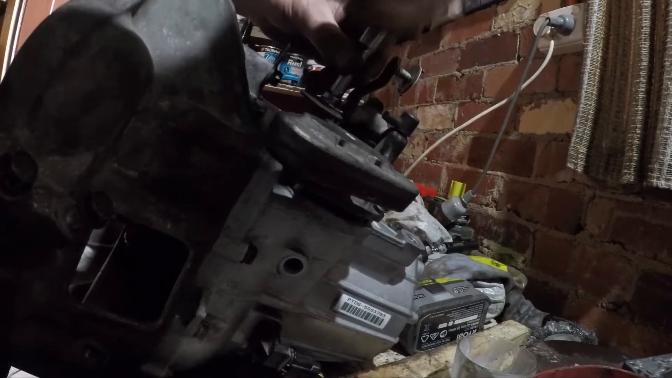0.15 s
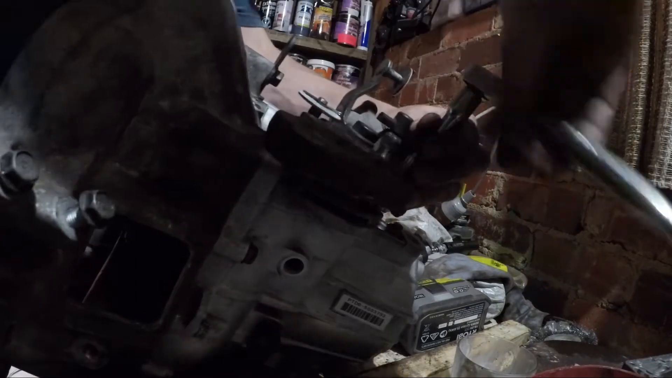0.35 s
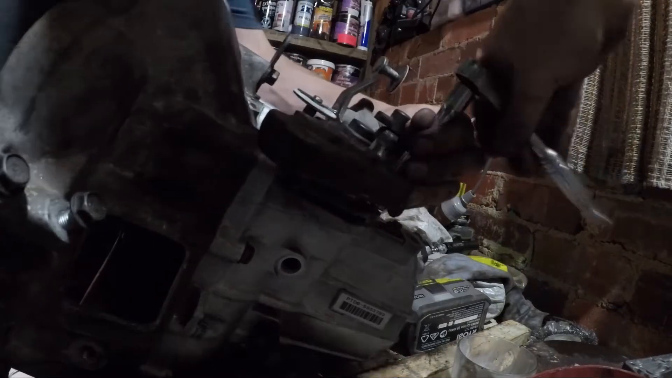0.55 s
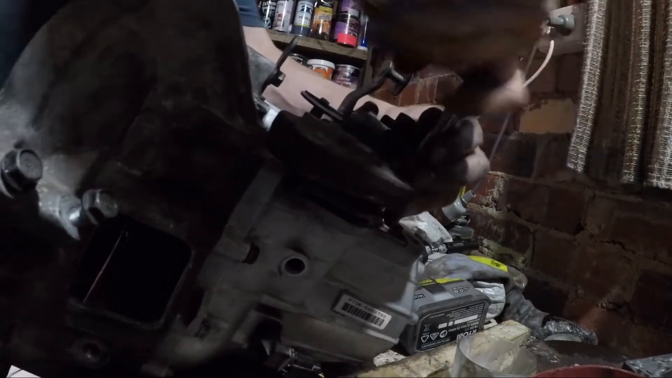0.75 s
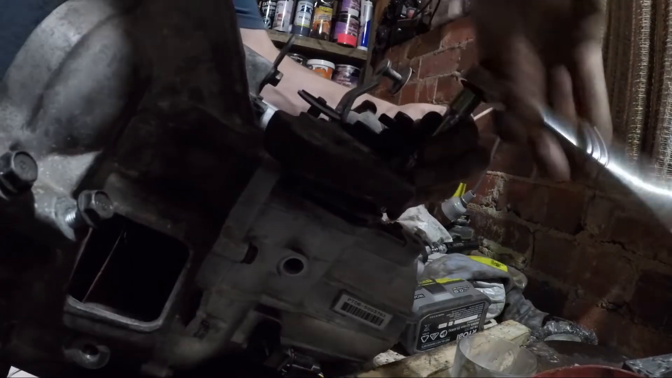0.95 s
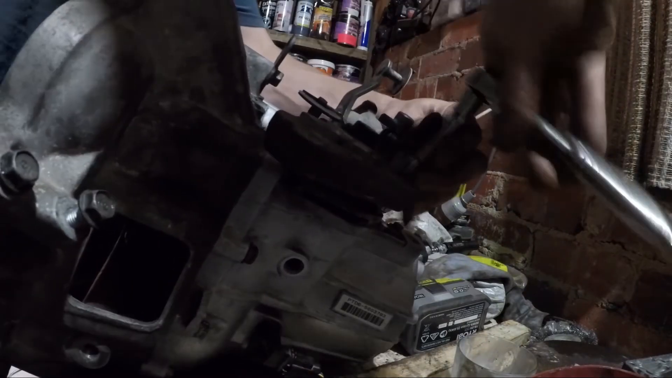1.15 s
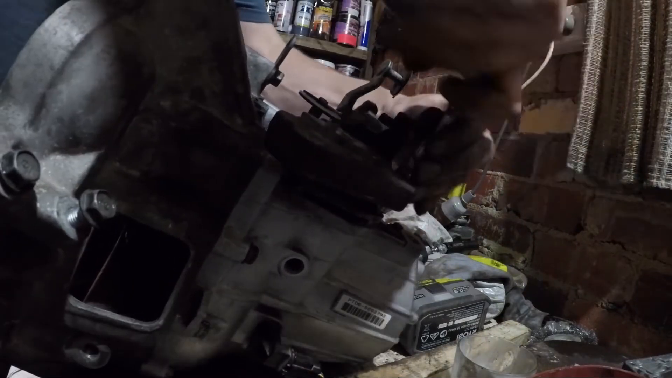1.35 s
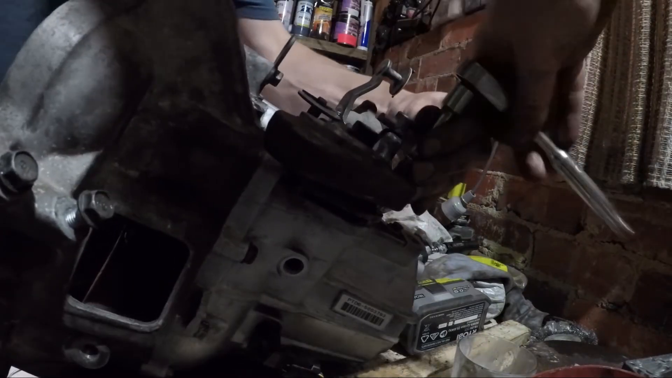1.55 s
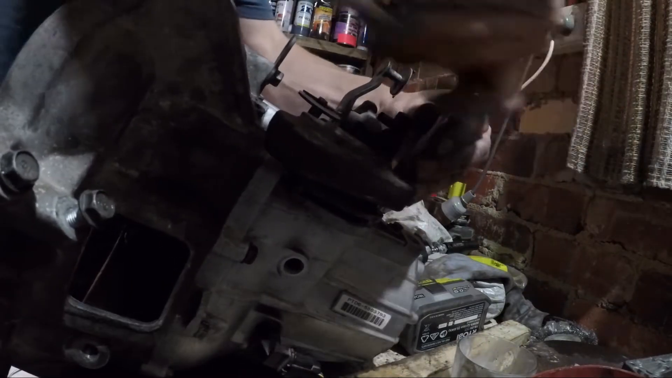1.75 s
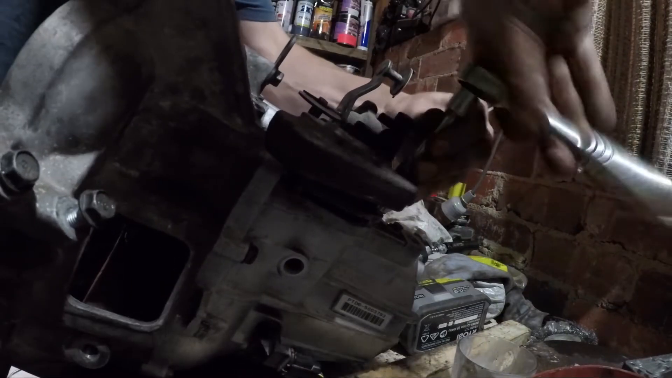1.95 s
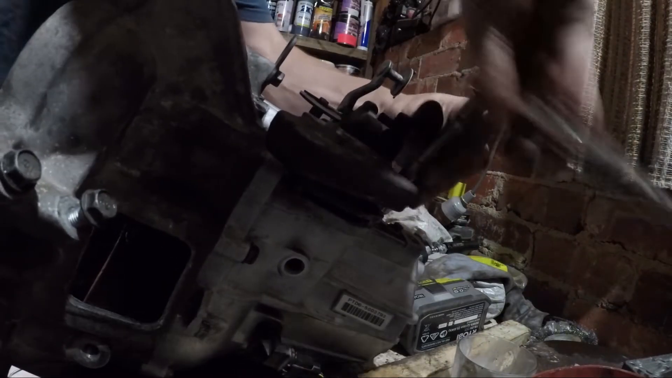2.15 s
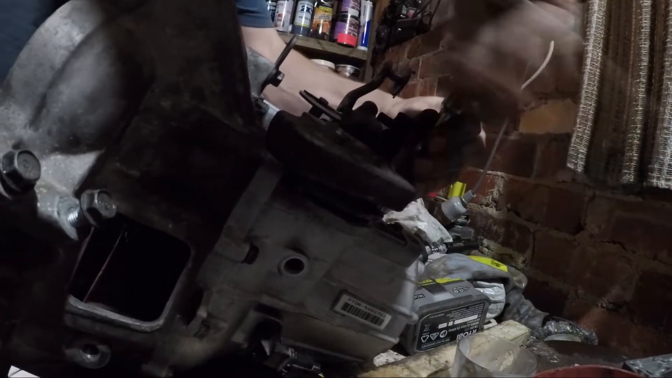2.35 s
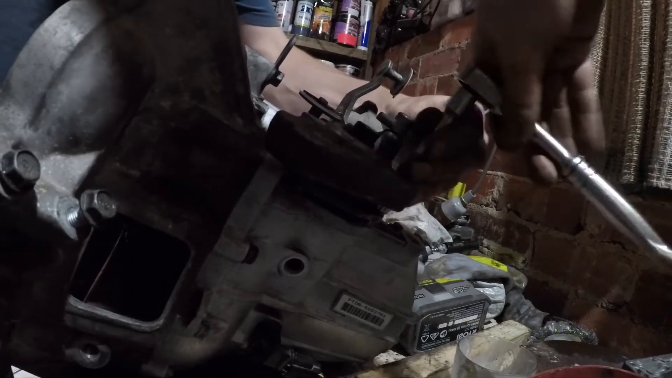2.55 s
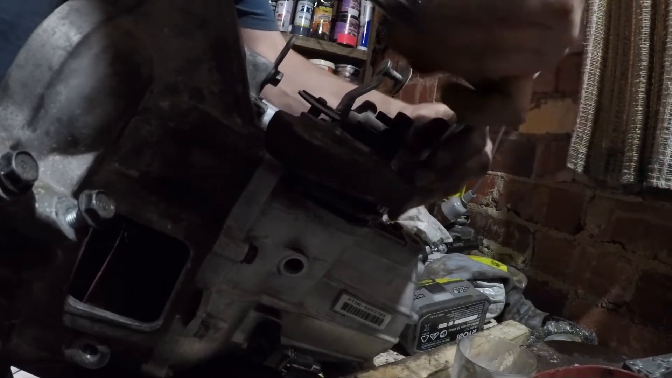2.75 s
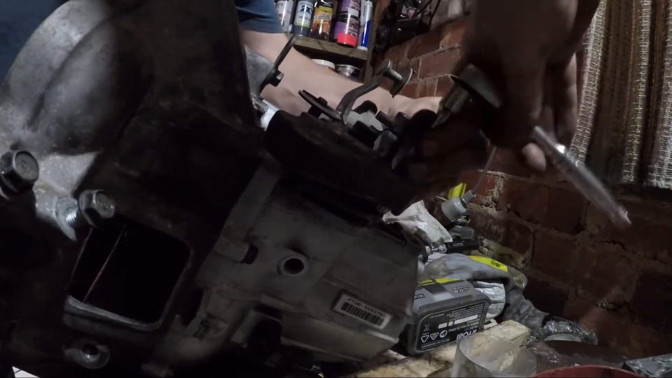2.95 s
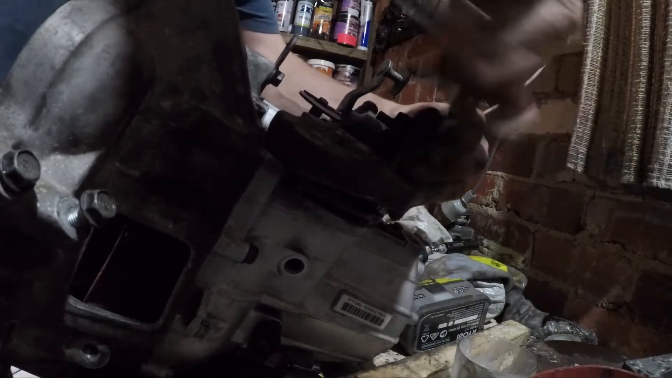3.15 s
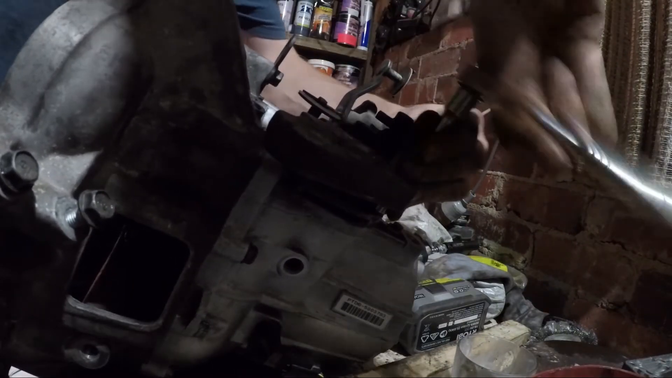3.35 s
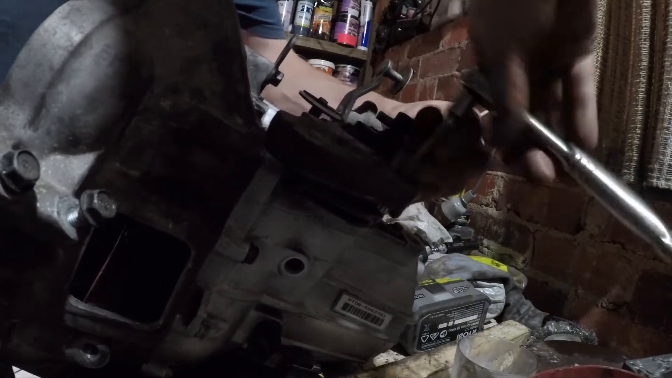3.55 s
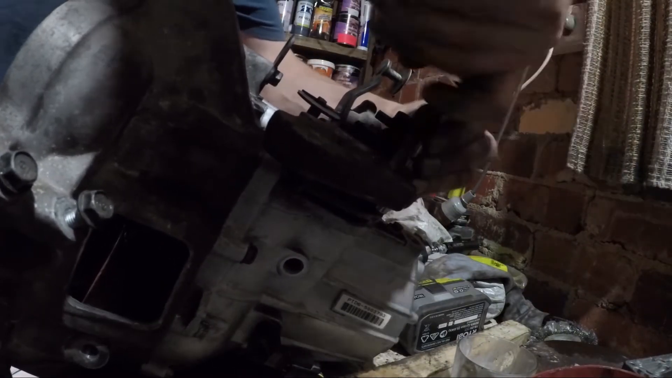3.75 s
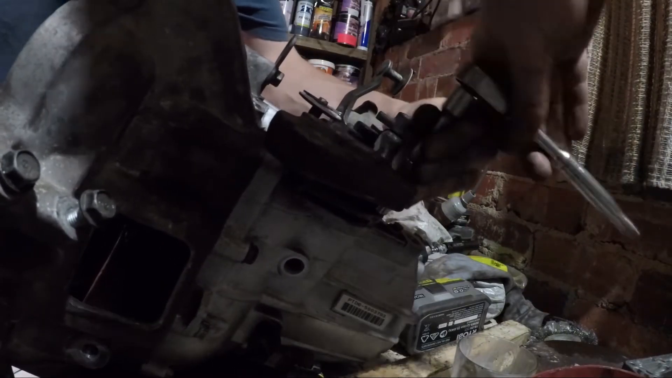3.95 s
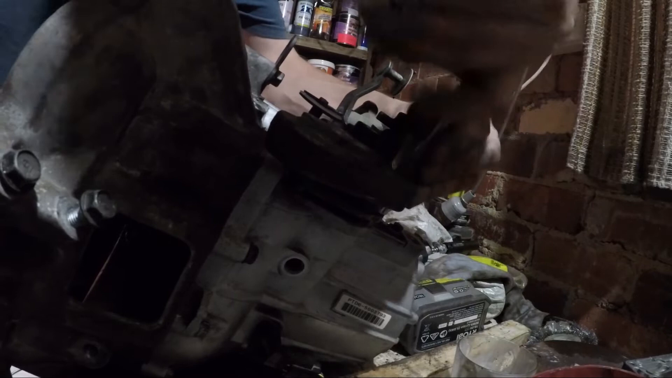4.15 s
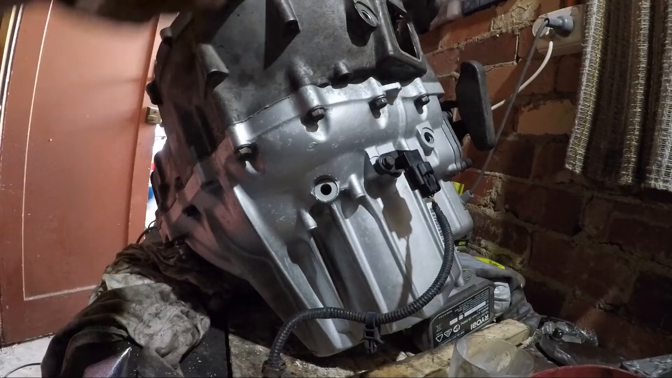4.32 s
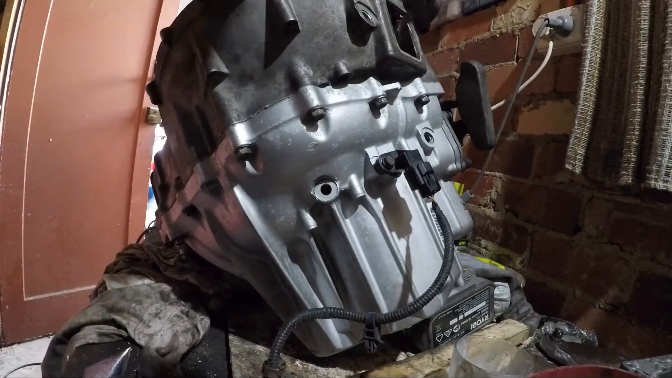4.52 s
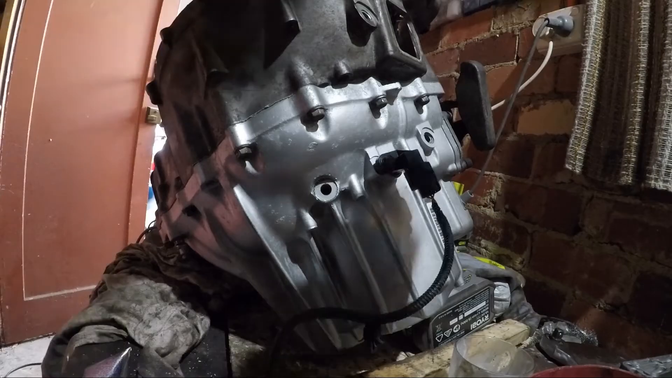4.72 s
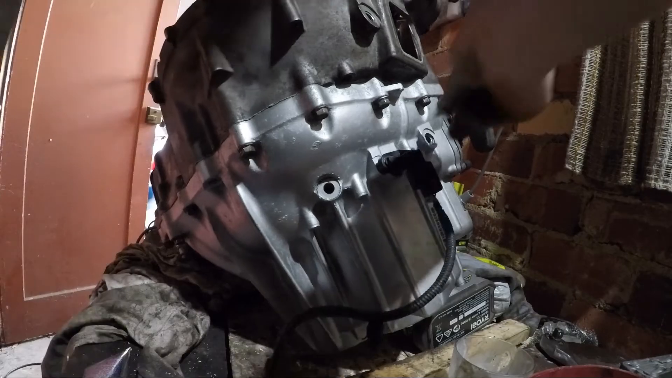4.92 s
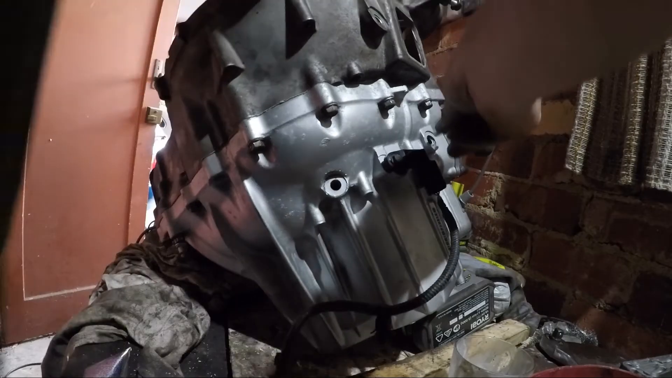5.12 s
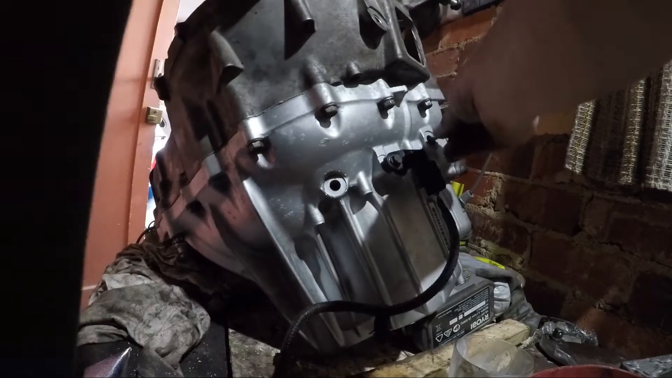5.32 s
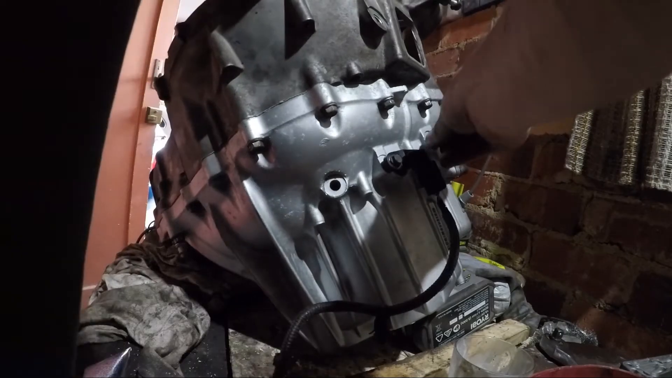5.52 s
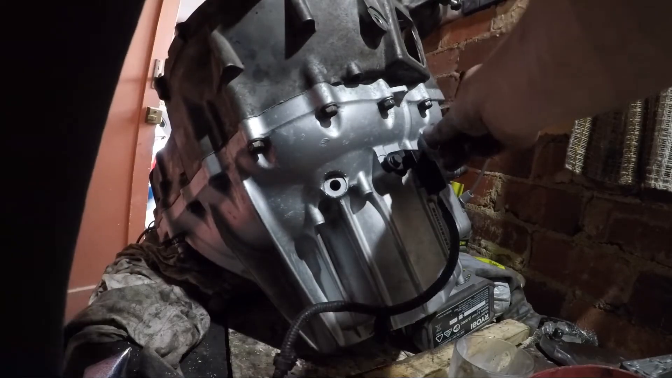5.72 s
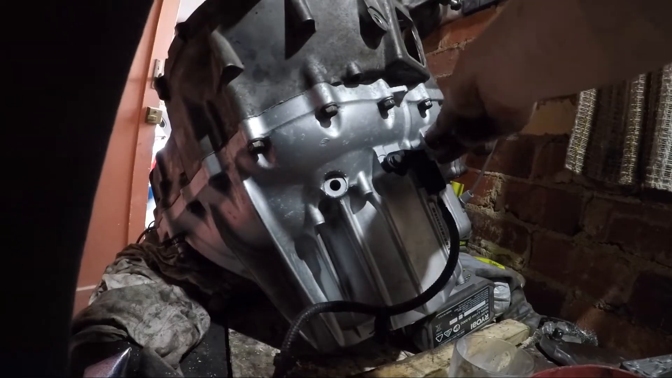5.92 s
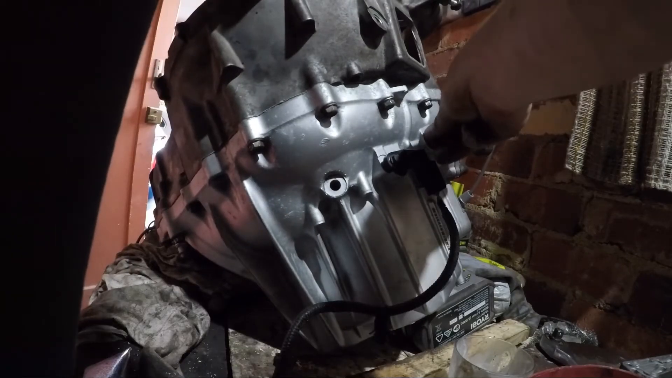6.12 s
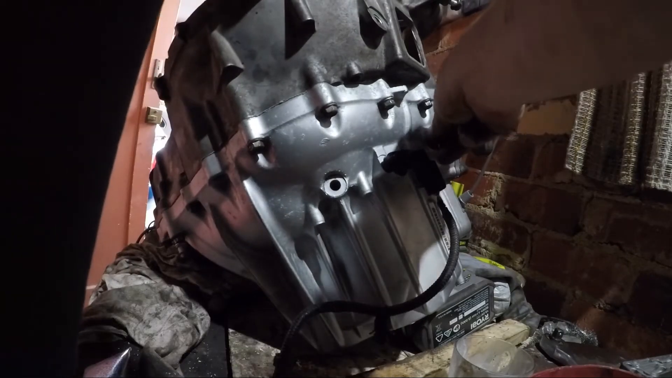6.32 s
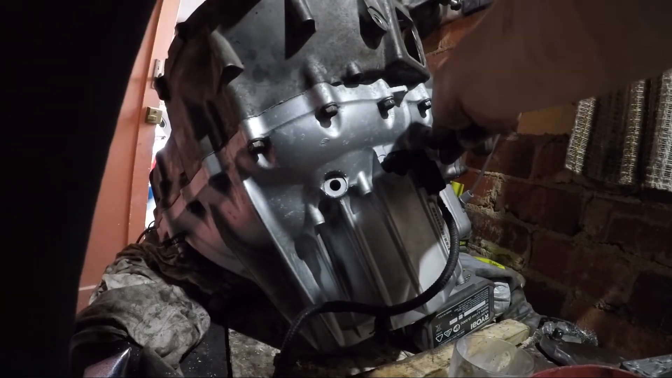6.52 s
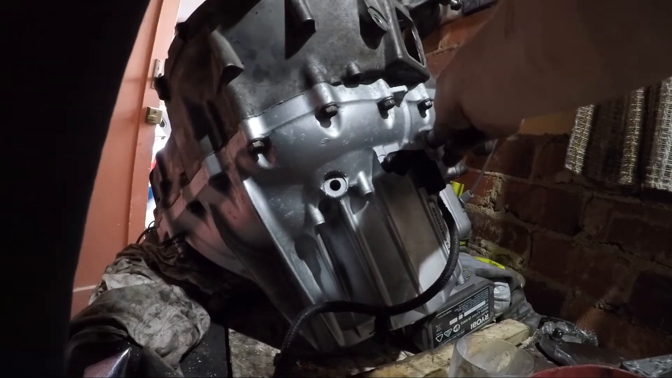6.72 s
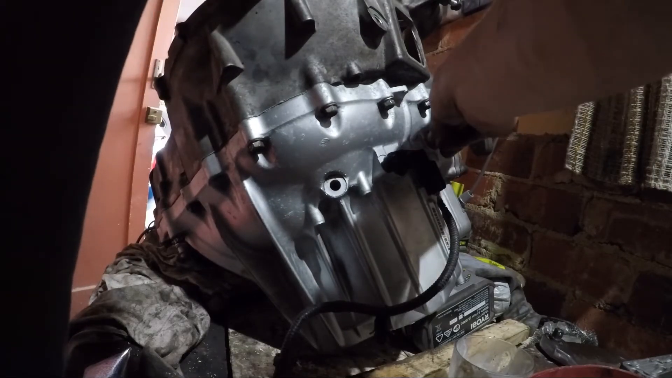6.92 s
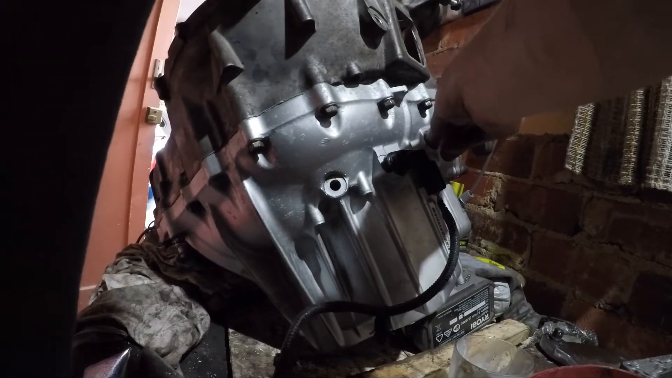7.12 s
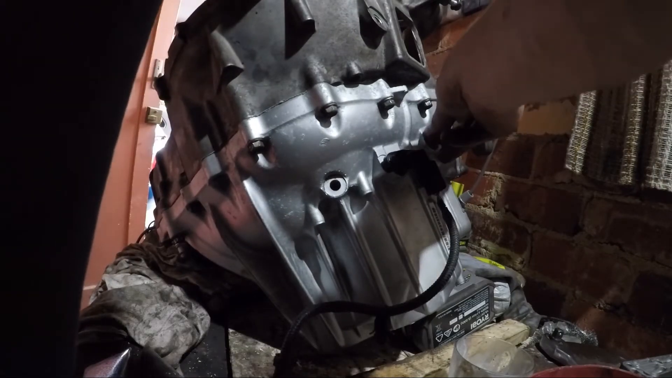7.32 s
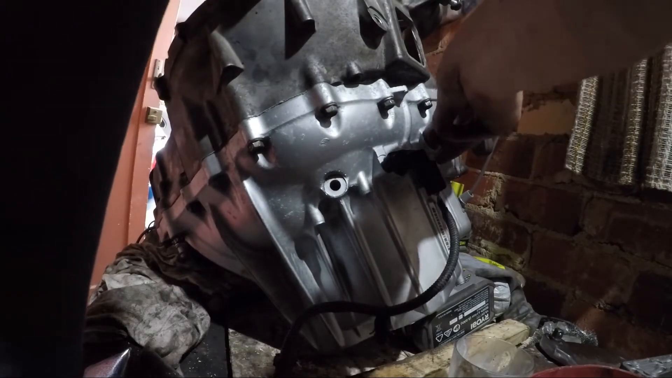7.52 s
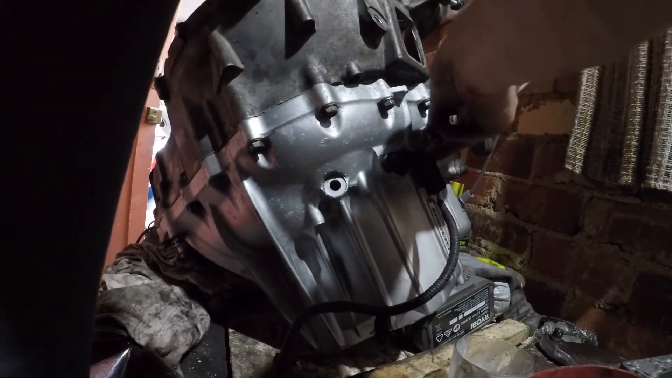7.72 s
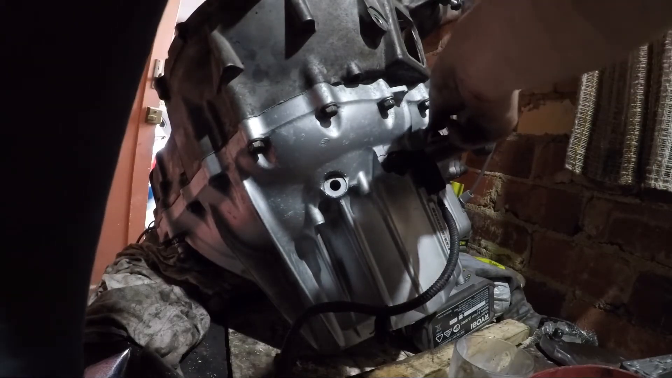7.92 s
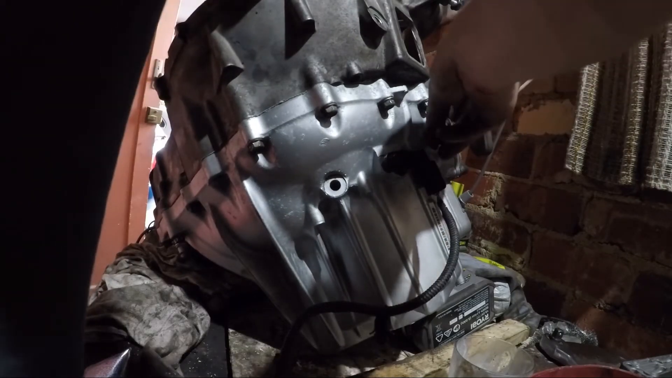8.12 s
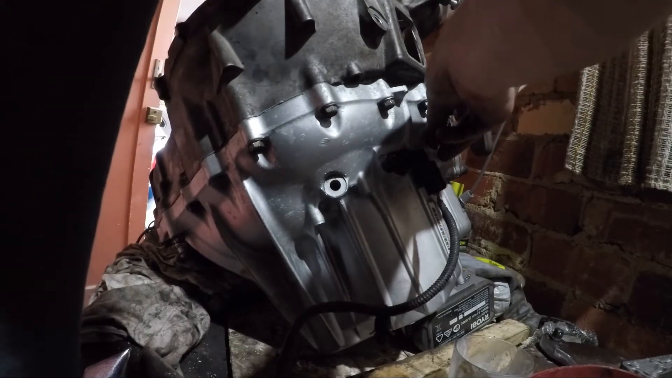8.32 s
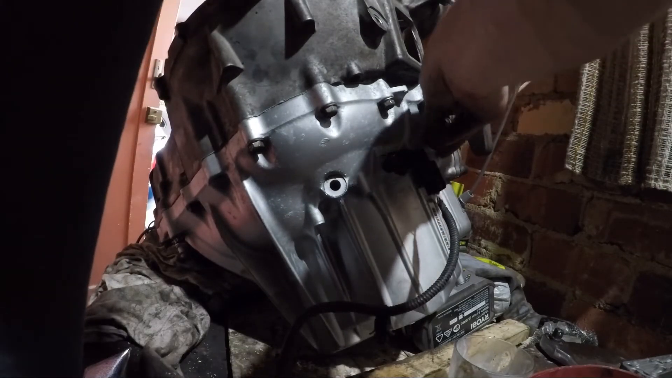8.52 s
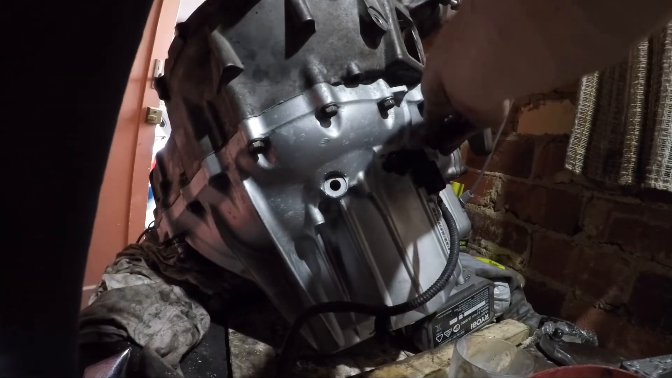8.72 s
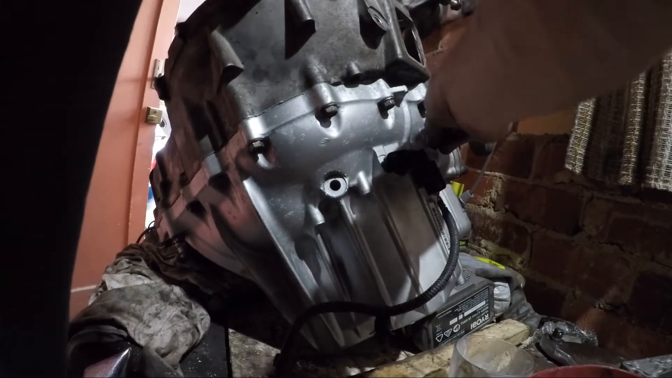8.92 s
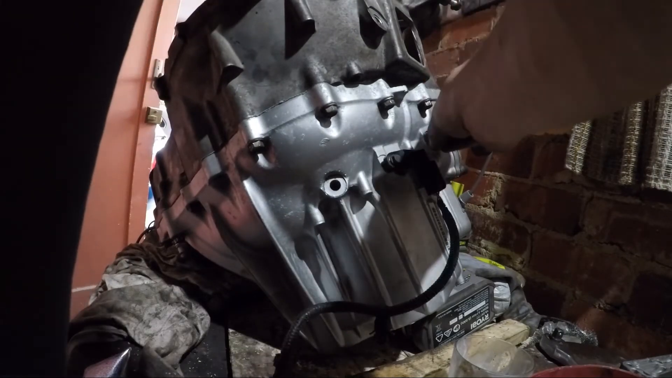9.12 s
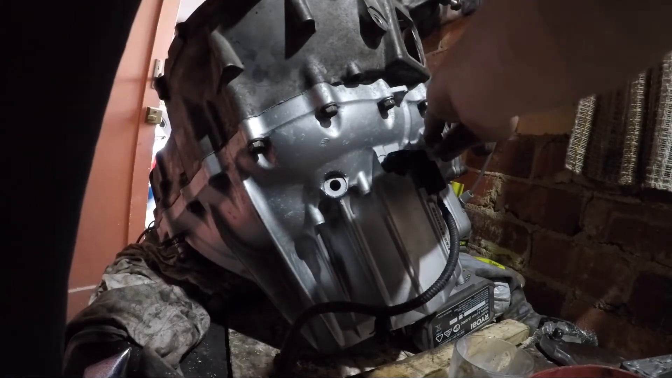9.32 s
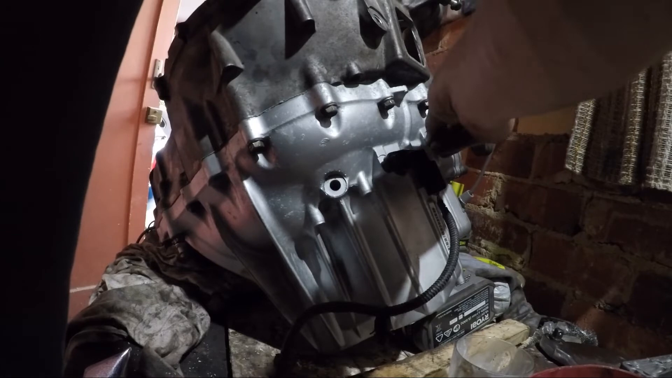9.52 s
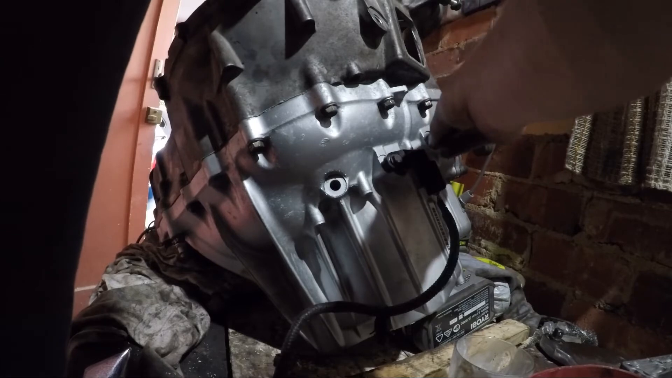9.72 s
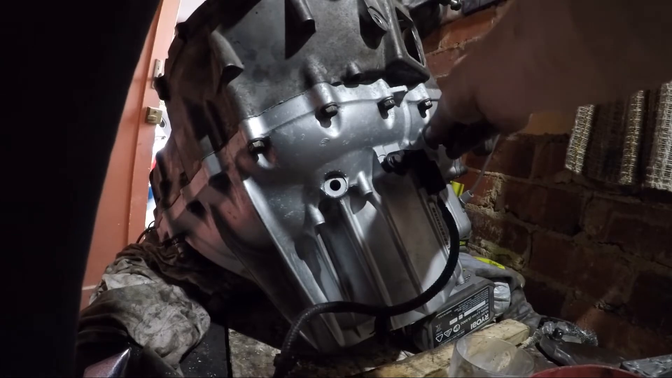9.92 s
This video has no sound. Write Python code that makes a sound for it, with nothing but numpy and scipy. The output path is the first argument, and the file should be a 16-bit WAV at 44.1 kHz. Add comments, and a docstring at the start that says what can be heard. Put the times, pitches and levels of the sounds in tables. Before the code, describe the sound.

A socket ratchet clicks in short repeated strokes over low bumps and hiss, then stops, leaving faint scrapes and ticks as a bolt is fitted.

```python
"""Microphone hiss and a soft thump ten times a second, probably radio interference, run throughout.
From the start a socket ratchet is swung to and fro on a gearbox in a small brick workshop: on each
return stroke the pawl strikes tooth after tooth, and the work shakes the microphone's mount into a low
rumble. Near 4.2 s the ratchet sound cuts off abruptly; a separate faint ring of struck metal fades.
Fingers then fit a bolt with faint scrapes and ticks; around 5 s a push makes the mount rumble again."""
import sys
import numpy as np
from scipy import signal
from scipy.fft import rfft, irfft, next_fast_len
from scipy.io import wavfile

SR = 44100
rng = np.random.default_rng(int(sys.argv[2]) if len(sys.argv) > 2 else 0)


def dump_mix(stems):
    """Bounce the given channels to the path in sys.argv[1] as a 16-bit WAV at rate SR."""
    frames = np.atleast_2d(stems).T  # one column per channel
    limited = np.clip(frames, -1, 1)  # hard clip at full scale
    pcm = np.round(limited * 32767).astype(np.int16)
    wavfile.write(sys.argv[1], SR, pcm)


N = 439236
TIME = np.arange(N) / SR
RATCHET_END_S, MOUNT_PUSH_S = 4.179, 4.44

# Table levels are relative: each source applies its own gain.
# hiss in the sum and in the difference of the channels (frequency [Hz], spectral density [dB])
HISS_MID = [(20, -47), (80, -47), (103, -52), (130, -6), (166, -0.5), (283, -6), (634, -14.5), (1280, -18),
            (3320, -24), (4980, -28), (6560, -25), (9410, -26.5), (12700, -33.5), (15000, -45),
            (16000, -66)]
HISS_SIDE = [(59, -72.5), (100, -50), (135, -9), (156, 0), (373, -4.5), (442, -6), (768, -5.5), (818, -8),
             (970, -6), (3780, -29.5), (6290, -26), (10000, -27.5), (14400, -39.5), (16000, -55)]
# jolts through the mount (time [s], knock level [dB], shaking level [dB])
JOLTS = [(.01, -60, -32), (.096, -41, -27.5), (.308, -19, -30.5), (0.429, -60, -36), (0.618, -15.5, -23),
         (.68, -60, -25.5), (.758, -45, -27), (0.919, -60, -30), (1.211, -64, -27.5), (1.286, -24, -29.5),
         (1.37, -60, -29.5), (1.446, -17, -29.5), (1.703, -26, -34.5), (1.781, -16, -24.5),
         (1.849, -60, -29), (1.882, -17, -28.5), (2.119, -27, -21.5), (2.26, -60, -22), (2.31, -60, -23.5),
         (2.37, -60, -28), (2.479, -30, -29), (2.564, -35, -32), (2.608, -27, -26.5), (2.761, -31, -25),
         (3.084, -20, -27.5), (3.2, -60, -28.5), (3.257, -15, -28), (3.313, -20, -30), (3.385, -60, -31.5),
         (3.527, -34, -33), (3.6, -60, -32), (3.697, -13.5, -26.5), (3.751, -16, -21), (3.81, -60, -24.5),
         (3.9, -60, -30.5), (3.967, -32, -32.5), (4.06, -60, -31), (4.129, -14, -23.5), (4.17, -60, -39.5),
         (4.521, -60, -37.5), (4.613, -60, -33), (4.73, -20.5, -31.5), (4.83, -60, -36), (4.894, -25, -30),
         (4.962, -29, -19.5), (5.01, -7, -22.5), (5.09, -60, -39), (5.53, -55, -53), (5.924, -58, -44)]
# the mount when shaken, pushed, swaying and rubbing (frequency [Hz], spectral density [dB])
SHAKE_SPECTRUM = [(53, -50), (90, -36), (108, -42), (134, -9), (157, 3.5), (205, -7), (252, -2),
                  (265, -7.5), (296, -31), (376, -63.5), (400, -63), (520, -60.5), (880, -120)]
PUSH_SPECTRUM = [(53, -56), (90, -40), (107, -47), (141, -3.5), (221, 2.5), (300, -9.5), (341, -9.5),
                 (500, -27), (620, -29), (810, -49), (1360, -120)]
SWAY_SPECTRUM = [(12, -31), (20, -3.5), (59, -6), (86, -4.5), (100, 7), (130, -8), (220, -120)]
RUB_SPECTRUM = [(250, -24), (330, -2), (500, -11.5), (1000, -9.5), (2000, -19), (4000, -34)]
# two spells of deep sway, each a list of (time [s], level [dB])
SWAY_SPELLS = [
    [(0, -74), (.3, -76), (.4, -77), (.66, -60), (1.12, -69), (1.45, -54), (1.6, -76), (1.85, -58),
     (2.05, -73), (2.26, -60), (2.48, -70), (2.62, -57), (2.78, -46.5), (3.02, -57.5), (3.32, -52.5),
     (3.5, -60), (3.76, -49), (3.92, -48), (4.17, -40)],
    [(4.5, -80), (4.62, -65), (4.87, -74), (5.1, -52), (5.2, -71), (5.6, -80)],
]
# the thump and the deep sag that follows it (frequency [Hz], level [dB])
THUMP_SPECTRUM = [(90, -50), (112, -45), (135, 0.5), (158, 4.5), (200, -2), (300, -20), (600, -33.5),
                  (1200, -51)]
SAG_SPECTRUM = [(10, -30), (35, -17), (70, -20), (105, -25), (130, -60)]
# first thump of the ratcheting and of the bolt fitting (time [s])
THUMP_STARTS = [.024, 4.2005]
# three groups of modes of ratchet and casting (frequency [Hz], bandwidth [Hz], level [dB])
LOW_MODES = [(2520, 730, -12), (3040, 770, 2.5), (3403, 990, 2.5), (4120, 200, -3), (4564, 490, -7.5)]
HIGH_MODES = [(6100, 1140, -0.5), (6940, 410, 6.5), (7200, 530, 3.5), (8380, 83, -2), (8800, 450, -7),
              (9950, 1470, -9.5), (11700, 360, -20.5), (14000, 2600, -23)]
KNOCK_MODES = [(715, 55, -7), (1186, 99, 6), (1430, 280, 0), (1876, 250, 6)]
# drive of each group (modes, lower edge [Hz], upper edge [Hz], coherence [0-1], left over right [dB])
MODE_GROUPS = [(LOW_MODES, 1960, 8900, 0.84, -2.2), (HIGH_MODES, 3630, 14000, 0.23, 0.4),
               (KNOCK_MODES, 520, 2850, 0.082, -0.36)]
# socket, handle and bolt touching metal (time [s], low modes [dB], high modes [dB], knock modes [dB])
TICKS = [(.0704, -48, -47, -45), (.0807, -38, -44, -45), (.0877, -32, -27, -42), (.3017, -37, -34, -40),
         (.3061, -33, -37, -34), (.3164, -35, -37, -38), (.5018, -44, -48, -50), (.5668, -44, -50, -48),
         (.6044, -35, -38, -38), (.6186, -29, -38, -37), (.6346, -43, -51, -49), (.7571, -34, -43, -49),
         (.764, -40, -42, -41), (1.1849, -41, -38, -47), (1.2053, -40, -40, -45), (1.2324, -42, -34, -48),
         (1.2495, -29, -27, -49), (1.2586, -49, -37, -49), (1.6994, -40, -35, -49), (1.7104, -48, -42, -48),
         (1.7406, -45, -46, -55), (1.7722, -33, -37, -40), (2.1175, -42, -41, -41), (2.1479, -35, -35, -47),
         (2.1687, -32, -31, -47), (2.1846, -46, -42, -53), (2.2051, -42, -42, -52), (2.2334, -36, -43, -46),
         (2.465, -44, -41, -47), (2.4888, -41, -48, -44), (2.6023, -31, -28, -32), (2.6202, -32, -33, -41),
         (2.6788, -44, -47, -40), (2.7022, -40, -42, -52), (3.0502, -41, -39, -47), (3.0839, -32, -38, -37),
         (3.0971, -38, -43, -45), (3.1782, -31, -41, -47), (3.1961, -46, -42, -46), (3.399, -32, -32, -43),
         (3.437, -36, -43, -53), (3.6017, -46, -48, -50), (3.6111, -41, -45, -49), (3.9346, -44, -48, -54),
         (4.0497, -35, -38, -47), (4.0849, -36, -34, -46), (4.1109, -44, -43, -49), (4.126, -31, -35, -31),
         (4.135, -38, -38, -38), (4.1574, -39, -37, -44), (4.1655, -39, -40, -47), (4.54, -54, -48, -49),
         (4.6268, -52, -54, -50), (5.0083, -47, -48, -48), (5.0348, -48, -53, -47), (5.2069, -48, -53, -45),
         (5.5117, -51, -62, -48), (5.847, -28, -28, -45), (5.9021, -37, -44, -40), (6.5866, -51, -66, -50),
         (7.4086, -38, -66, -53), (7.6985, -42, -50, -46), (8.1833, -53, -61, -57), (8.4551, -43, -58, -52),
         (8.4901, -52, -57, -55), (9.0074, -55, -48, -59), (9.2298, -53, -58, -53)]
# return strokes, each a list of (time [s], handle angle [teeth], pawl level [dB])
STROKES = [
    [(.0919, 0, -21), (.1085, 2, -21), (.1322, 4, -24), (.1479, 6, -31), (.1614, 8, -25), (.1847, 11, -24),
     (.1927, 12, -19), (.2161, 15, -21), (.2264, 16, -27)],
    [(.3299, 0, -25), (.3355, 1, -21), (.3575, 3, -16), (.3824, 5, -16), (.4143, 7, -18), (.4341, 8, -22)],
    [(.7786, 0, -19), (.7876, 1, -21), (.8005, 2, -21), (.8707, 10, -17), (.8859, 11, -20),
     (.9175, 15, -18), (.9286, 16, -20), (.9429, 17, -20), (.9649, 18, -21)],
    [(1.2198, 0, -25)],
    [(1.2868, 0, -19), (1.33, 5, -20), (1.3445, 7, -20), (1.3608, 10, -16), (1.3878, 14, -20),
     (1.4063, 17, -19), (1.422, 19, -19), (1.4437, 21, -18), (1.4612, 22, -17)],
    [(1.7786, 0, -17), (1.7997, 2, -16), (1.8163, 4, -17), (1.8554, 10, -17), (1.865, 12, -18),
     (1.911, 19, -20), (1.9197, 20, -19), (1.9323, 21, -18)],
    [(2.2421, 0, -18), (2.2493, 1, -17), (2.2588, 2, -19), (2.3057, 9, -17), (2.3275, 13, -20),
     (2.339, 14, -21), (2.3663, 18, -18), (2.3751, 19, -20), (2.386, 20, -19)],
    [(2.7155, 0, -18), (2.7319, 2, -17), (2.7442, 4, -18), (2.7673, 7, -18), (2.7934, 11, -18),
     (2.8177, 13, -22), (2.8434, 16, -15), (2.8586, 17, -16)],
    [(3.2064, 0, -18), (3.2304, 2, -17), (3.2457, 4, -17), (3.3222, 16, -19), (3.3393, 18, -17),
     (3.3497, 19, -15)],
    [(3.6941, 0, -19), (3.7078, 1, -17), (3.7198, 2, -18), (3.7358, 4, -18), (3.756, 7, -16),
     (3.7612, 8, -17), (3.8201, 17, -19), (3.8277, 18, -20), (3.8372, 19, -18), (3.8501, 20, -17)],
    [(4.1755, 0, -19)],
]
# timbre of each stroke (low modes [dB], high modes [dB], knock modes [dB], rise of low modes [dB])
STROKE_TIMBRES = [(-3.5, -1, -12, 10), (-3.5, 1.5, -20, 1), (-1, 1.5, -17, 6), (-6.5, 2.5, -16, -1),
                  (-1.5, 1, -18.5, 2.5), (-1, -0.5, -19, 2.5), (-1, 1, -18.5, 3), (-2, 0, -18, -1),
                  (-1.5, 0.5, -18.5, 2), (-0.5, -2, -18, 2), (-4.5, 2, -23, 2)]
# friction of the pawl in each stroke (level [dB])
DRAG_LEVELS = [-38.5, -42, -41, -60, -34.5, -36.5, -41.5, -36.5, -37.5, -35, -60]
# modes of a separate piece of struck metal (frequency [Hz], level [dB], time to fall 60 dB [s])
RING_MODES = [(2890, -58, 1.2), (3000, -60, 1.1), (3480, -64, .8), (4330, -60, 1.1), (4600, -61, 1.0),
              (6050, -66, .8)]
# fingers turning the bolt (time [s], level [dB])
SCRAPES = [(4.292, -52), (4.42, -55), (4.546, -56), (4.635, -55), (7.565, -57), (7.63, -61), (8.185, -64),
           (8.46, -52), (8.51, -56), (9.136, -63), (9.234, -73)]


def from_db(db):
    """Amplitude grows tenfold for every 20 dB."""
    return 10 ** (np.asarray(db) / 20)


def unit_rms(x):
    """Normalisation to a mean power of 1."""
    return x / np.sqrt(np.mean(x ** 2) + 1e-20)


def colour(x, spectrum):
    """Zero-phase filtering by a table of (frequency [Hz], level [dB])."""
    size = next_fast_len(N + SR // 4)
    hz, db = np.transpose(spectrum)
    log_hz = np.log(np.arange(size // 2 + 1) * SR / size + 1)
    gain = from_db(np.interp(log_hz, np.log(hz), db))
    return irfft(rfft(x, size) * gain, size)[..., :N]


def noise(spectrum):
    """Filtered white noise takes on the filter's spectrum; its rms is 1."""
    return unit_rms(colour(rng.standard_normal(N), spectrum))


def drift(corner_hz):
    """Low-pass filtered noise gives a random fluctuation of rms 1."""
    pole = np.exp(-2 * np.pi * corner_hz / SR)
    return unit_rms(signal.lfilter([1], [1, -2 * pole, pole * pole], rng.standard_normal(N + SR))[SR:])


def impulses(seconds, heights):
    """Ideal impulses, each one sample long."""
    train = np.zeros(N)
    np.add.at(train, np.round(np.asarray(seconds) * SR).astype(int), heights)
    return train


def swells(seconds, peaks_db, rise_db_per_s, fall_db_per_s):
    """Exponential growth and decay about each peak; the strongest sets the envelope."""
    t = np.arange(N // 32 + 2) * 32 / SR
    level_db = np.full(len(t), -120.)
    for s, db in zip(seconds, peaks_db):
        slope = np.where(t < s, rise_db_per_s, fall_db_per_s)
        level_db = np.maximum(level_db, db - slope * np.abs(t - s))
    return from_db(np.interp(TIME, t, level_db))


def resonate(x, modes, strengths_db=None):
    """Superposition of damped modes of alternating sign; each row of x may weight them differently."""
    out = 0
    for k, (hz, width_hz, db) in enumerate(modes):
        radius = np.exp(-np.pi * width_hz / SR)
        b = (1 - radius ** 2) / 2 * np.array([1, 0, -1])
        a = [1, -2 * radius * np.cos(2 * np.pi * hz / SR), radius ** 2]
        db = db if strengths_db is None else db + strengths_db[:, k:k + 1]
        out = out + (-1) ** k * from_db(db) * signal.lfilter(b, a, x + 1e-18)
    return out


def microphone_hiss():
    """Stationary self-noise, independent in the sum and the difference of the channels."""
    mid = from_db(-54) * noise(HISS_MID)
    side = from_db(-49.5) * noise(HISS_SIDE)
    return np.array([mid + side, mid - side])


def mount_vibration():
    """Structure-borne sound: the microphone's mount sways, and jolts make it knock, rumble and rub."""
    s, knock_db, shake_db = np.transpose(JOLTS)
    ratcheting = TIME < RATCHET_END_S
    moving = ratcheting | (TIME > MOUNT_PUSH_S)
    peak_s = s + .011   # shaking lags the jolt
    rub_db = shake_db - 23.5 - 3.5 * (s > RATCHET_END_S)   # the push rubs less
    shake = moving * swells(peak_s, shake_db, rise_db_per_s=477, fall_db_per_s=166)
    rub = moving * swells(peak_s, rub_db, rise_db_per_s=477, fall_db_per_s=347)
    sway = sum(from_db(np.interp(TIME, *np.transpose(spell), left=-120, right=-120))
               for spell in SWAY_SPELLS)

    def rumble():
        """Random vibration coloured by the response of the shaken or pushed mount."""
        return shake * np.where(ratcheting, noise(SHAKE_SPECTRUM), noise(PUSH_SPECTRUM))

    blows = impulses(s + .00557, from_db(knock_db + 36.5))
    knocks = np.where(ratcheting, colour(blows, SHAKE_SPECTRUM), colour(blows, PUSH_SPECTRUM))
    thud = colour(impulses(seconds=[.328], heights=1), SWAY_SPECTRUM)   # one blow below the rumble
    knocks += from_db(-34) * thud / thud.max()
    lumps = from_db(1.2 * drift(20))
    mid = from_db(-5) * rumble() * lumps + sway * noise(SWAY_SPECTRUM) + knocks
    mid += rub * noise(RUB_SPECTRUM)
    side = from_db(-13) * rumble() + from_db(1) * rub * noise(RUB_SPECTRUM)
    return np.array([mid + side, mid - side])


def interference_thumps(period_s=.1024, sag_lag_s=.004):
    """A periodic pulse train of uneven strength, alike in both channels; it restarts near 4.2 s."""
    ratchet_s, bolt_s = (np.arange(start, N / SR - sag_lag_s, period_s) for start in THUMP_STARTS)
    s = np.concatenate([ratchet_s[ratchet_s < RATCHET_END_S], bolt_s])
    heights = from_db(rng.normal(0, 1.3, len(s)))
    pulses = colour(impulses(s, heights), THUMP_SPECTRUM)
    sags = colour(impulses(s + sag_lag_s, heights), SAG_SPECTRUM)
    unit_peak = colour(impulses([1], 1), THUMP_SPECTRUM).max()
    return from_db(-36.5) * (pulses - sags) / unit_peak


def impacts(rows, chatter_t60_s, top_hz, rise_s=.0003, spread_db=2.5):
    """Impact excitation: brief metal chatter drives the three groups of modes; rows are as in TICKS."""
    s, *levels_db = np.transpose(rows)
    t = TIME[:SR // 25]
    chatter = (1 - np.exp(-t / rise_s)) * from_db(-60 * t / chatter_t60_s)
    samples = np.round((s - .0005) * SR).astype(int)[:, None] + np.arange(len(t))
    left_right = np.array([1, -1])[:, None, None]
    out = np.zeros((2, N + len(t)))
    for (modes, low_hz, high_hz, coherence, balance_db), level_db in zip(MODE_GROUPS, levels_db):
        mid, side = np.moveaxis(rng.standard_normal((len(s), 2, len(t))), 1, 0) * chatter
        force = np.sqrt(1 + coherence) * mid + np.sqrt(1 - coherence) * side * left_right
        band = signal.butter(2, [low_hz, min(high_hz, top_hz)], "band", fs=SR, output="sos")
        strengths_db = rng.normal(0, spread_db, (len(s), len(modes)))
        response = resonate(signal.sosfilt(band, force), modes, strengths_db)
        response *= from_db(left_right * balance_db / 2)
        onset_rms = np.sqrt(np.mean(response[..., :SR // 330] ** 2, axis=(0, 2)))   # first 3 ms
        response *= (from_db(level_db) / onset_rms)[:, None]
        for channel in range(2):
            np.add.at(out[channel], samples, response[channel])
    return out[:, :N]


def metal_ticks(loose_count=30):
    """Light collisions of socket, handle and bolt; play in the socket adds faint ones at random."""
    loose_s = rng.uniform(.01, RATCHET_END_S, loose_count)
    loose_db = rng.normal(-52, 4, (loose_count, 3))
    rows = np.vstack([TICKS, np.column_stack([loose_s, loose_db])])
    return from_db(-4) * impacts(rows, chatter_t60_s=.028, top_hz=6800)


def pawl_clicks(spread_db=2.2, jitter_s=.0003):
    """The pawl drops at each whole tooth, so the impact rate follows the handle's angular speed."""
    rows = []
    for stroke, (*timbre_db, rise_db) in zip(STROKES, STROKE_TIMBRES):
        s, angle, db = np.transpose(stroke)
        teeth = np.arange(angle[-1] + 1)
        scatter = rng.standard_normal((len(teeth), 4))
        drop_s = np.interp(teeth, angle, s) + jitter_s * scatter[:, 0]
        levels_db = np.interp(teeth, angle, db)[:, None] + timbre_db + spread_db * scatter[:, 1:]
        levels_db[:, 0] += rise_db * (teeth / len(teeth) - .5)
        rows.extend(np.column_stack([drop_s, levels_db]))
    return from_db(-3) * impacts(rows, chatter_t60_s=.006, top_hz=16000)


def pawl_drag(edge_s=.0044):
    """Sliding friction between teeth drives the steel's modes with a gritty hiss through each stroke."""
    envelope = np.zeros(N)
    for stroke, db in zip(STROKES, DRAG_LEVELS):
        start, end = stroke[0][0], stroke[-1][0]
        envelope += from_db(db) * np.interp(TIME, [start - edge_s, start, end, end + edge_s], [0, 1, 1, 0])
    mid, side = rng.standard_normal((2, N)) * from_db(4.1 * drift(150))
    friction = mid + .76 * side * [[1], [-1]]
    low = unit_rms(resonate(friction, LOW_MODES))
    high = unit_rms(resonate(friction, HIGH_MODES))
    return envelope * (low + from_db(2.5) * high)


def workshop_reverb(x, t60_s=.13, treble_t60_s=.11):
    """Reflections from close brick walls merge into an exponential decay whose treble dies first."""
    t = TIME[:SR // 4]
    shared, *separate = rng.standard_normal((3, len(t)))
    reflections = 1.5 * shared + np.array(separate)   # partly coherent between the channels
    dull = signal.sosfilt(signal.butter(2, 5000, fs=SR, output="sos"), reflections)
    tail = dull * from_db(-60 * t / t60_s) + (reflections - dull) * from_db(-60 * t / treble_t60_s)
    tail *= t > .002   # delay of the first reflection
    tail /= np.sqrt(np.sum(tail ** 2, axis=1, keepdims=True))
    return from_db(-7.5) * signal.fftconvolve(x, tail, axes=1)[:, :N]


def metal_ring(width_hz=70):
    """Exponential decay of a separate piece of struck metal; each mode is a narrow band of noise."""
    out = np.zeros((2, N))
    start = round(RATCHET_END_S * SR)
    for hz, db, t60_s in RING_MODES:
        wavering = unit_rms(resonate(rng.standard_normal((2, SR)), [(hz, width_hz, 0)]))
        out[:, start:start + SR] += wavering * from_db(db - 60 * TIME[:SR] / t60_s)
    return out


def bolt_scrapes():
    """Uneven friction excites the low modes at each turn of the bolt."""
    envelope = swells(*np.transpose(SCRAPES), rise_db_per_s=300, fall_db_per_s=150)
    friction = rng.standard_normal(N) * from_db(2.9 * drift(88))
    return from_db(-5) * envelope * unit_rms(resonate(friction, LOW_MODES))


def scene():
    """Linear superposition of the sources; the ratchet sound and its reverberation cut off abruptly."""
    clicks, ticks, scrapes = pawl_clicks(), metal_ticks(), bolt_scrapes()
    ratcheting = TIME < RATCHET_END_S
    ratchet = (ticks + clicks + pawl_drag()) * ratcheting
    ratchet = (ratchet + workshop_reverb(ratchet)) * ratcheting
    bolt = ticks * (TIME >= RATCHET_END_S + .05) + scrapes
    bolt = bolt + from_db(-2) * workshop_reverb(bolt)
    return ratchet + bolt + metal_ring() + mount_vibration() + interference_thumps() + microphone_hiss()


def record(dry, stopband_hz=16560):
    """Band limiting: a steep low-pass filter removes the highest treble."""
    return signal.sosfilt(signal.cheby2(12, 70, stopband_hz, fs=SR, output="sos"), dry)


dry = scene()
out = record(dry)
dump_mix(out)
```